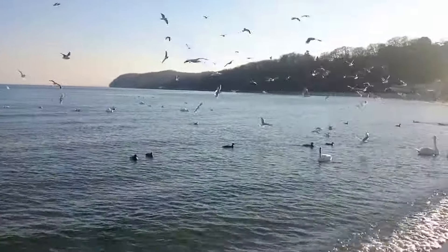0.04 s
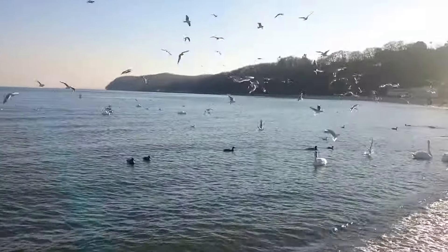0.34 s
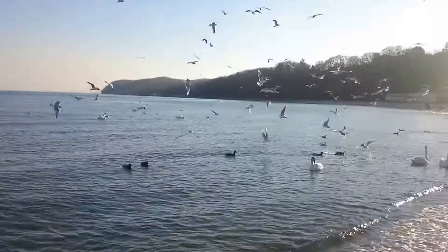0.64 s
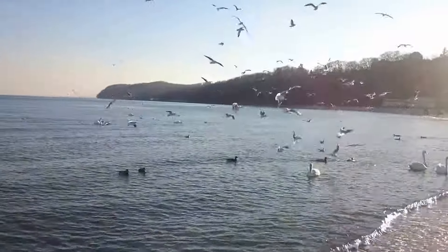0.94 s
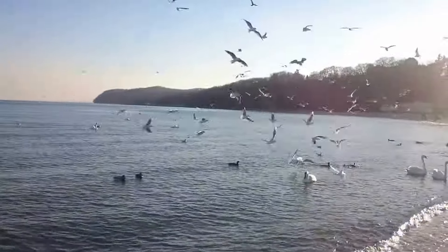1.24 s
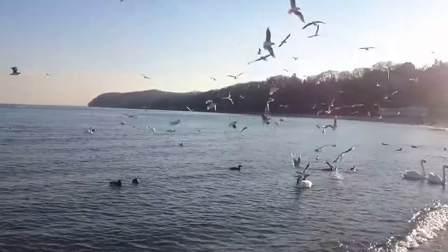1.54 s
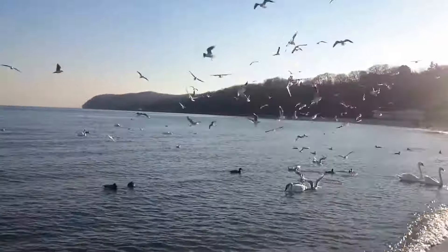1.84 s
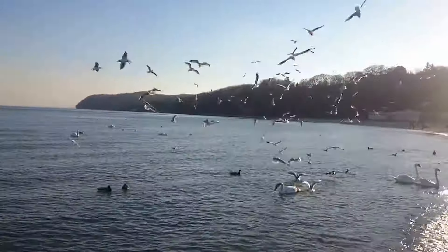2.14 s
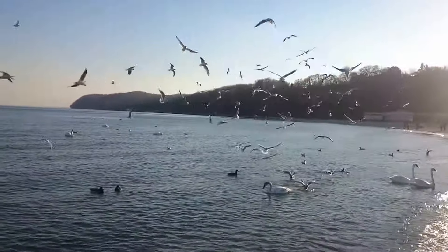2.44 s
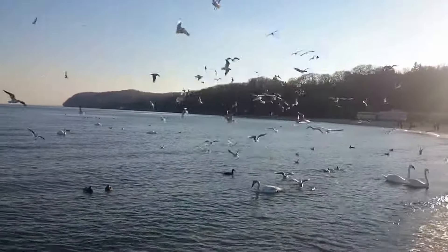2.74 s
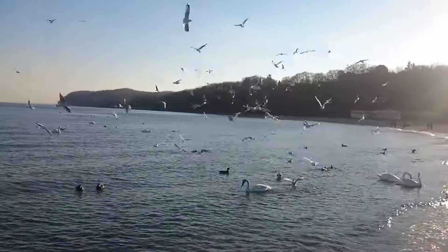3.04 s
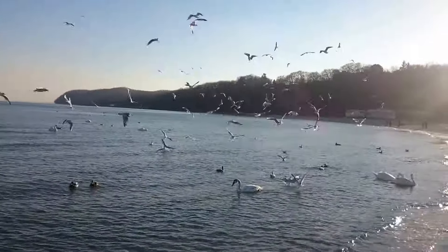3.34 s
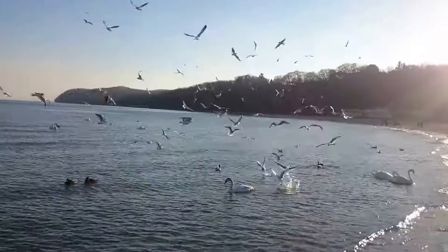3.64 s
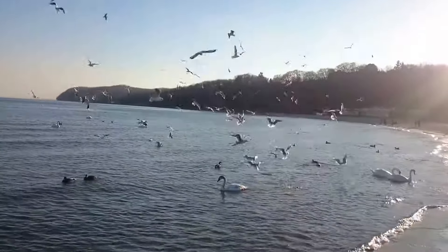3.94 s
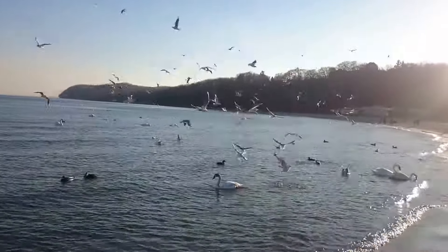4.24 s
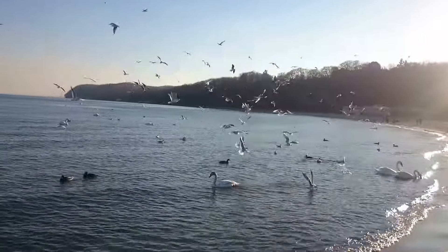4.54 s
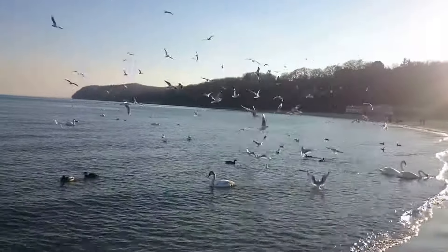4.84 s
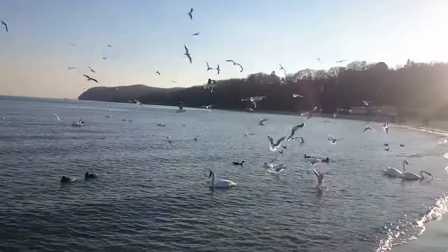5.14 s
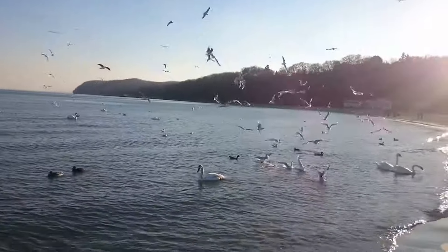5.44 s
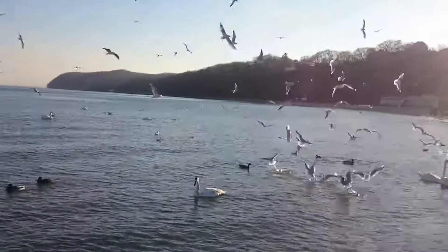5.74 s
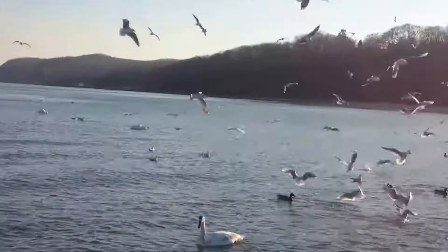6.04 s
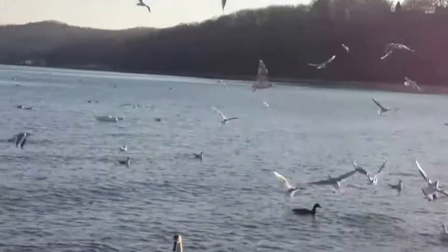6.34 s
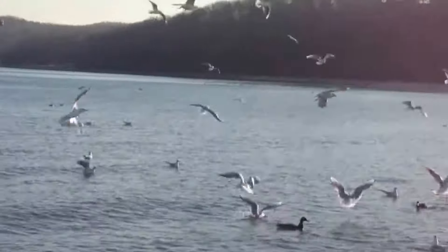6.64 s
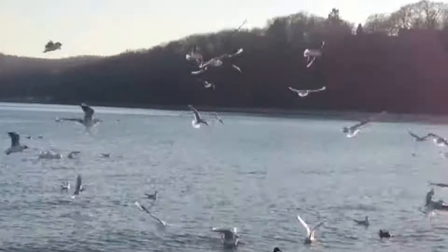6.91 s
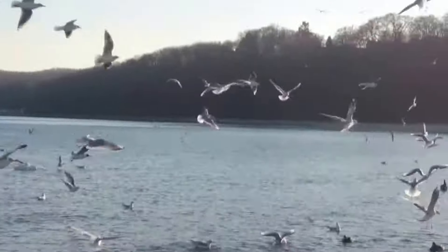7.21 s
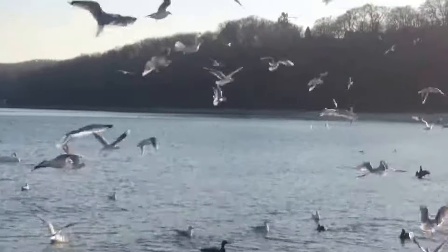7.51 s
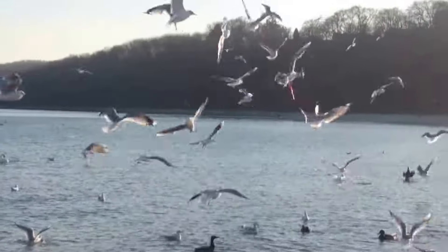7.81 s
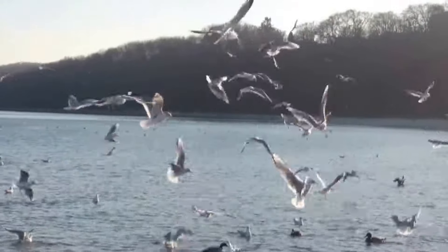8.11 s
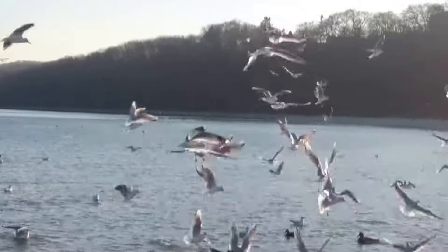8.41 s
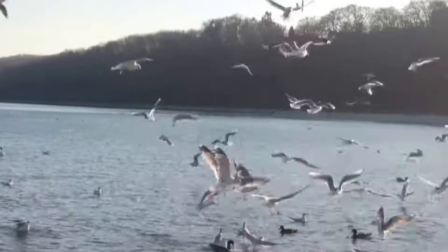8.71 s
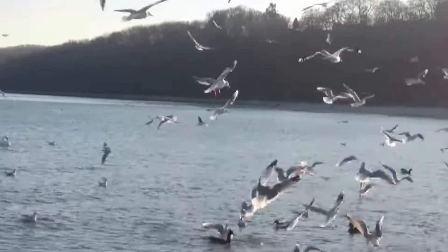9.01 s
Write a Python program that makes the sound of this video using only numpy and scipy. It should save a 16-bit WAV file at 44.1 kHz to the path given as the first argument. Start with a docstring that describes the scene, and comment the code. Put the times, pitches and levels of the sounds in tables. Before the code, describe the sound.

A long, high gull squeal opens, followed by short hoarse barks, thin whistles and more squeals from a flock over the water, mostly to the left. Small waves keep breaking on the beach, bubbling and leaving foam hissing on the right. A light breeze rumbles on the microphone and thumps a few times midway. Toward the end, rattling cries join in and the squabble grows loudest.

```python
"""Gulls squabble over the water off a beach. A long squeal opens the scene; rasping barks, thin whistles
and more squeals follow, all from vibrating syrinx membranes, mirrored by the water and faintly echoed
by the wooded shore. Meanwhile small waves break in a rush of bubbles, leaving foam hissing on the right,
and a light breeze rumbles on the microphone ports, thumping between 4 and 5.5 s. From 6.5 s rattling
cries join in, and the squabble is loudest near 8.5 s."""
import sys
import numpy as np
from scipy import signal
from scipy.fft import rfft, irfft, next_fast_len
from scipy.io import wavfile
from scipy.ndimage import uniform_filter1d, map_coordinates

SR = 44100
rng = np.random.default_rng(int(sys.argv[2]) if len(sys.argv) > 2 else 0)


def wav_record(signal):
    """Record a signal, one row per channel, as 16-bit PCM in the file named by sys.argv[1]."""
    frames = np.transpose(np.atleast_2d(signal))
    bounded = np.clip(frames, -1, 1)
    # unit amplitude maps onto the largest positive 16-bit level
    quanta = np.round(bounded * 32767).astype(np.int16)
    wavfile.write(sys.argv[1], SR, quanta)


N = 404397
TIME = np.arange(N) / SR
CALL_SIZE = SR // 2
CALL_TIME = np.arange(CALL_SIZE) / SR  # s since a call's window opens

# Stereo position of the flock: time_s, left_minus_right_db
FLOCK_BALANCE = [(0, 9.5), (.95, 11), (1.35, 9), (3.1, 10), (4.8, 13), (6.7, 18), (7.8, 12.5), (8.45, 9.5),
                 (8.8, 12)]
def gulls(echo_db=-14, near_reflection_db=-5, water_reflectance=.58):
    """Multipath propagation: calls arrive directly, mirrored in the water and echoed by the shore."""
    far = barks() + far_flock()
    near = whistles() + rattles() + squeals()
    reflected = far + amp(near_reflection_db) * near
    lags_s = [.0022 + 0.000497 * wobble(1.8) for port in range(2)]  # the detour changes as they fly
    mirrored = np.array([map_coordinates(reflected, [np.arange(N) - SR * lag]) for lag in lags_s])
    echo = amp(echo_db) * sides([7]) * shore_echo(reflected)
    return sides(curves(FLOCK_BALANCE)[0]) * (far + near + water_reflectance * mirrored) + echo


# Harsh low-register calls:
# middle_s, length_s, pitch_hz, level_db, roughness, tilt_db_per_octave, glide_octaves
BARK_CALLS = [(.86, 0.04, 920, -37.5, 0.43, -14, -0.045), (1.127, 0.05, 1120, -27.5, 0.63, -4.5, -0.32),
              (1.331, 0.042, 1086, -25.5, 0.55, -1.5, -0.11), (1.355, 0.044, 965, -27, 0.55, -3, -0.3),
              (1.43, 0.029, 1078, -28.5, 0.04, 8, -0.22), (3.625, 0.15, 914, -38, 0.89, -9, -0.12),
              (3.95, 0.18, 1007, -34.5, 0.8, -3, -.35), (4.766, 0.017, 1087, -31, 0.13, -5, -0.0086),
              (4.785, 0.077, 947, -36.5, 0.76, -10, -0.16), (4.866, 0.038, 1058, -25.5, 0.3, -6, -0.084),
              (5.431, 0.042, 952, -35, 0.75, 3, 0.081), (5.946, 0.041, 1048, -32, 0.22, -11, -0.0053),
              (6.075, 0.057, 922, -44, 0.5, -13, -0.18), (6.19, 0.073, 927, -41.5, .5, -10, 0.13),
              (6.221, 0.042, 1053, -33, 0.34, -0.5, -0.15), (6.428, 0.043, 1040, -33, 0.26, -1, 0.013),
              (6.5, 0.12, 1056, -34, 0.4, -0.5, -.03), (6.775, 0.085, 1024, -35.5, .5, 1, -0.2),
              (7.25, 0.054, 1090, -34.5, .75, -1, -0.15), (8.152, 0.037, 1000, -37, 0.4, -10.5, -0.08),
              (8.31, 0.045, 1000, -40.5, 0.7, -7, 0.023), (8.43, 0.069, 1265, -28, 0.67, -2, 0.21),
              (8.512, 0.036, 1077, -26.5, .7, -2, 0.11), (8.536, .022, 1109, -18.5, .45, 0, -0.039),
              (8.615, .07, 1440, -34, 0.56, -1, -.05), (8.793, 0.044, 1107, -29, 0.58, -4, -.3),
              (8.997, 0.066, 1032, -32, 0.92, -6, 0.034)]
def barks():
    """Irregular vibration of strained membranes gives short, hoarse calls."""
    return calls(BARK_CALLS, bark_voice, arch=0.14, edge=0.71)


# Resonances of a gull's throat and open bill: frequency_hz, gain_db
VOCAL_TRACT = [(600, -67), (1100, -21.5), (1700, 0.5), (2200, -4.5), (2700, 3.5), (3400, 4), (4300, 4),
               (4900, -1.5), (5600, 1), (6300, -5.5), (7100, -5.5), (8000, -15), (10000, -28), (14000, -59)]
def bark_voice(pitch, rough, tilt_db, jitter=0.0295, waver=0.0196, pull=0.047, air=0.91, scatter=0.99):
    """Source and filter: the throat shapes frayed harmonics and turbulent air, pulsed by the rasp."""
    def throat(hz):
        return amp(along(VOCAL_TRACT, hz) + tilt_db * np.clip(octaves(hz, 3400), -.8, .8))

    def fray():  # random phase widens a harmonic into a band
        offset, knots = 2 * np.pi * rng.random(), CALL_TIME[::64]
        return offset + scatter * rough * np.interp(CALL_TIME, knots, rng.standard_normal(len(knots)))

    cycle, bursts = rasp(rough)
    unsteady = jitter * wobble(700, CALL_SIZE) + waver * wobble(88.9, CALL_SIZE)
    phase = phase_of(pitch * (1 + rough * (unsteady + pull * cycle)))  # each burst pulls the pitch up
    tone = sum(throat(k * pitch) * amp(3.2 * rng.standard_normal()) * np.sin(k * phase + fray())
               for k in range(1, 9))
    breath = filtered(rng.standard_normal(CALL_SIZE), throat)
    air_share = np.clip(air * rough, 0, 1)
    return bursts * (np.sqrt(1 - air_share ** 2) * unit(tone) + air_share * unit(breath))


# Rattling cries of near birds: middle_s, length_s, pitch_hz, level_db, roughness,
# beat_hz, bill_hz, focus_db_per_octave, glide_octaves
RATTLE_CALLS = [(6.554, 0.069, 1026, -36, .5, 80, 2400, 3, -.25),
                (6.65, 0.13, 992, -38.5, 0.82, 80, 2300, 11, -0.025),
                (7.6725, 0.043, 1120, -25, 0.33, 110, 3660, 15, -0.022),
                (7.8065, 0.062, 1110, -28.5, 0.5, 95, 3370, 4, -0.048),
                (8.0455, 0.051, 1122, -28.5, .4, 110, 3200, 9.5, 0.035),
                (8.661, 0.07, 1130, -25.5, .95, 76.4, 4040, 4, -0.15),
                (8.746, 0.086, 1160, -21, 0.9, 91, 4500, 3, -0.037),
                (8.862, 0.06, 1130, -25, 0.5, 68, 3870, 2, -.2)]
def rattles():
    """Deep amplitude modulation chops each cry into nearly even beats."""
    return calls(RATTLE_CALLS, rattle_voice, arch=.08, edge=1.15)


def rattle_voice(pitch, rough, beat_hz, bill_hz, focus_db, depth_db=5.0, pull=0.017, jitter=.045):
    """Formant filtering: the bill picks out a few harmonics, whose level and pitch each beat lifts."""
    def bill(hz):
        return amp(along(VOCAL_TRACT, hz) - focus_db * np.abs(octaves(hz, bill_hz)))

    cycle = centred_cycle(beat_hz * (1 + 0.05 * wobble(66, CALL_SIZE)))
    phase = phase_of(pitch * (1 + pull * cycle + rough * jitter * wobble(500, CALL_SIZE)))
    tone = 0
    for k in range(1, 9):
        fray = 2 * np.pi * rng.random() + rough * wobble(400, CALL_SIZE)
        tone += bill(k * pitch) * np.sin(k * phase + fray)
    breath = filtered(rng.standard_normal(CALL_SIZE), bill)
    beats = amp(depth_db * cycle + wobble(beat_hz, CALL_SIZE))
    return unit(beats * (unit(tone) + rough * unit(breath)))


# Clear high-register notes: middle_s, length_s, pitch_hz, level_db, roughness
WHISTLE_CALLS = [(.55, 0.15, 3640, -56, .05), (2.348, .049, 1847, -44, 0.75),
                 (2.435, 0.1, 1764, -47.5, 0.58), (2.519, 0.087, 1816, -47.5, 0.28),
                 (2.63, 0.11, 1774, -50, 0.42), (2.773, 0.12, 1773, -47.5, 0.53),
                 (3.361, .12, 2870, -40.5, .75), (4.97, 0.055, 3000, -40, 0.18),
                 (5.043, 0.065, 4350, -46, 0.15), (5.112, 0.081, 3030, -43.5, .2),
                 (5.259, .18, 3140, -49, 0.46), (6.34, .097, 2380, -51, 0.3), (6.451, .04, 2500, -38, .7),
                 (6.561, .1, 2090, -42, .55), (6.768, .065, 3084, -35.5, 0.15),
                 (7.191, .11, 2830, -45.5, 0.65), (7.866, .09, 2950, -38.5, 0.7),
                 (8.473, 0.056, 3210, -27, 0.08), (8.476, 0.068, 4520, -32, 0.1),
                 (8.566, .032, 3170, -30, 0.4), (8.572, .06, 4400, -35, 0.25),
                 (8.625, .04, 2854, -32, 0.55), (8.83, .036, 4230, -37, .3)]
def whistles(overtone_db=-17, glide_octaves=-.06):
    """Nearly sinusoidal vibration gives thin notes that fall slightly in pitch."""
    rows = [(*row, overtone_db, glide_octaves) for row in WHISTLE_CALLS]
    return calls(rows, whistle_voice, arch=.05, edge=5.5)


def whistle_voice(pitch, rough, overtone_db, jitter=0.133, waver=0.0484, air=0.82, focus_db=12):
    """Random frequency modulation: strain scatters a tone and its two overtones into a screech."""
    def bill(hz):
        return amp(along(VOCAL_TRACT, hz) - focus_db * np.abs(octaves(hz, pitch.mean())))

    _, bursts = rasp(rough, flutter_hz=159.0, depth_db=-1.5, uneven_db=3)
    unsteady = jitter * wobble(1100, CALL_SIZE) + waver * wobble(110, CALL_SIZE)
    phase = phase_of(pitch * (1 + rough * unsteady))
    tone = np.sin(phase)
    for k in (2, 3):
        rolloff = 1 + (k * pitch / 8000) ** 16  # overtones fade above the bill's range
        tone += amp((k - 1) * overtone_db) / (k - 1) * np.sin(k * phase) / rolloff
    breath = filtered(rng.standard_normal(CALL_SIZE), bill)
    return bursts * (np.sqrt(2) * tone + air * rough * unit(breath))


# Long cries, one list a voice; the last two are the two sides of one bird's syrinx:
# time_s, pitch_hz, level_db, roughness, overtone_db
SQUEAL_CONTOURS = [
    [(.058, 2410, -29, 0.3, -20), (.068, 2477, -27.5, 0.2, -11), (.09, 2418, -24.5, 0, -14),
     (.128, 2590, -33, 0.14, -21), (.168, 2390, -24, 0.05, -9.5), (.2, 2410, -30, 0.05, -32),
     (.272, 2480, -25, 0, -14), (.305, 2210, -36.5, 0.5, -7), (.39, 2440, -37.5, 0.99, -16),
     (.472, 2780, -46, 0.85, -29)],
    [(.905, 3280, -40, 0.2, -32), (.94, 3460, -46.5, 0.53, -13), (1.0, 3710, -44, 0.42, 1),
     (1.055, 3920, -34, 0.42, -8), (1.08, 3410, -35, 0.63, -10), (1.105, 2700, -37.5, 0.6, -10.5),
     (1.155, 1874, -39, 0.55, -8)],
    [(3.02, 3300, -48, 0.08, -32), (3.06, 3660, -41, 0.28, -4), (3.1, 3765, -43, 0.2, -10),
     (3.155, 3670, -40.5, 0.06, -9), (3.2, 3900, -46, 0.17, -2), (3.22, 3920, -33, 0.27, -17),
     (3.252, 3560, -33, 0.48, -23), (3.265, 2390, -41.5, 0.52, 1), (3.305, 1886, -43, 0.8, 2)],
    [(3.04, 4060, -46, 0.37, -30), (3.09, 4240, -35.5, 0.16, -24), (3.16, 4200, -33.5, 0.15, -28),
     (3.225, 4290, -50, 0.5, -30)],
]
# Register changes, one list a voice: start_s, end_s, jump_octaves, change_db
REGISTER_FLIPS = [
    [(0.178, 0.251, 0.2, -2.5)],
    [],
    [(3.108, 3.139, -0.18, 8)],
    [(3.108, 3.145, 0.24, -7)],
]
def squeals(flip_s=0.0038, attack_s=0.0038, release_s=0.0059):
    """Register breaks: long cries jump between modes of vibration and roughen into a screech."""
    track = np.zeros(N)
    for contour, flips in zip(SQUEAL_CONTOURS, REGISTER_FLIPS):
        start, end = contour[0][0], contour[-1][0]
        t = start + CALL_TIME
        pitch, db, rough, overtone_db = curves(contour, t)
        for on, off, jump, change_db in flips:
            flipped = np.clip(.5 + np.minimum(t - on, off - t) / flip_s, 0, 1)
            pitch = pitch * 2 ** (jump * flipped)
            db = db + change_db * flipped
        gate = np.clip(np.minimum(CALL_TIME / attack_s, (end - t) / release_s), 0, 1)
        add(track, start, amp(db) * gate * whistle_voice(pitch, rough, overtone_db))
    return track


def rasp(rough, flutter_hz=84, depth_db=2.0, uneven_db=2.7):
    """Amplitude modulation: strained membranes open in bursts. Returns the cycle and its gain."""
    rate_hz = flutter_hz * (1 + 0.078 * rng.standard_normal() + 0.104 * wobble(39.1, CALL_SIZE))
    cycle = centred_cycle(rate_hz)
    gain_db = depth_db * rough ** 2 * cycle + uneven_db * rough * wobble(160.1, CALL_SIZE)
    return cycle, unit(amp(gain_db))


def calls(rows, voice, arch, edge, full_db=-26, dulling=0.57):
    """Envelope and glide: each call swells and fades as its pitch bends; far, faint ones lose treble."""
    track, centre = np.zeros(N), CALL_TIME.mean()
    for middle_s, length_s, pitch, db, rough, *timbre, glide in rows:
        position = np.clip(2 * (CALL_TIME - centre) / length_s, -2, 2)  # -1 to 1 across the call
        steepness = np.where(position < 0, 2 * edge, edge)  # the start is more abrupt than the end
        envelope = np.exp(-np.abs(position) ** steepness) * np.cos(np.pi * position / 4)
        bend_octaves = glide * position / 2 - arch * position ** 2 * (1 - rough / 2)
        call = amp(db) * envelope * voice(pitch * 2 ** bend_octaves, rough, *timbre)
        treble_db = dulling * min(db - full_db, 0)
        dulled = filtered(call, lambda hz: amp(treble_db * np.clip(octaves(hz, 3500), 0, 1)))
        add(track, middle_s - centre, dulled)
    return track


def far_flock(count=60, level_db=-66.5, rough=.7, tilt_db=-2.5, glide_octaves=-.1):
    """Incoherent summation: hoarse, distant calls at random times merge into a dull din."""
    rows = [((i + delay) * N / SR / count, .05 + .1 * length, 800 + 400 * pitch,
             level_db + 6 * (strength - .5), rough, tilt_db, glide_octaves)
            for i, (delay, length, pitch, strength) in enumerate(rng.random((count, 4)))]
    din = calls(rows, bark_voice, arch=0.12, edge=1.0)
    return filtered(din, lambda hz: 1 / np.sqrt(1 + (hz / 3900) ** 20))


def shore_echo(sound, t60_s=0.53):
    """Diffuse scattering from waves and shore gives each port its own exponentially decaying tail."""
    tail = rng.standard_normal((2, CALL_SIZE)) * amp(-60 * CALL_TIME / t60_s)
    return signal.fftconvolve(sound[None], tail / np.linalg.norm(tail[0]), axes=1)[:, :N]


# Spectra of tumbling water, spray, foam and trapped air pockets: frequency_hz, density_db
WATER_SPECTRUM = [(60, 4), (150, 0), (300, -3), (500, 0.5), (800, 1.5), (1300, 2.5), (2200, 1), (3500, -1),
                  (6000, -24.5), (12000, -52)]
SPRAY_SPECTRUM = [(200, -30), (600, -12.5), (1300, -10), (2200, -11), (4000, -11), (5600, -7.5),
                  (7000, -14), (8500, -23), (11000, -37.5), (15000, -54)]
FOAM_SPECTRUM = [(3000, -32), (7000, 3), (9500, -3), (12500, -2), (14000, -6), (15700, -30)]
POCKET_SPECTRUM = [(80, -13), (170, -10.5), (250, -1.5), (350, -6), (600, -0.5), (1500, -27.5)]
# Depth of each layer's random wavering: water_db, spray_db, foam_db
WAVER_DEPTHS = (0.5, 0.8, 1.3)
def surf(spray_gain_db=1, foam_gain_db=3, boom_db=-41.0):
    """Bubble resonance: the smaller the higher, from booming air pockets to foam fizzing on the sand."""
    water_db, spray_db, foam_db = wave_levels()
    gurgle = [bubbles(4000, low_hz=447, high_hz=2570, cycles=6.2, spread_db=0.5) for port in range(2)]
    drops = [bubbles(7000, low_hz=1800, high_hz=9000, cycles=8, spread_db=2.5) for port in range(2)]
    pops = [bubbles(4000, low_hz=7000, high_hz=14000, cycles=3, spread_db=3.5) for port in range(2)]
    water_waver, spray_waver, foam_waver = [depth * wobble(17) for depth in WAVER_DEPTHS]
    water = amp(water_db + water_waver) * wash(WATER_SPECTRUM, gurgle, grainy=0.21, patchy_db=2.0)
    spray = amp(spray_db + spray_waver) * wash(SPRAY_SPECTRUM, drops, grainy=0.42, patchy_db=1.6)
    foam = amp(foam_db + foam_waver) * wash(FOAM_SPECTRUM, pops, grainy=0.27, patchy_db=2.0)
    # a big wave traps large air pockets: their boom grows faster than the wash
    pockets = unit(filtered(rng.standard_normal(N), lambda hz: amp(along(POCKET_SPECTRUM, hz))))
    boom = amp(boom_db + 3.05 * (spray_db - spray_db.max())) * sides([6]) * pockets
    return water + boom + amp(spray_gain_db) * spray + amp(foam_gain_db) * foam


# Waves reaching the sand: break_s, tumble_s, water_db, spray_db, fizz_db, lingering_foam_db
BREAKERS = [(-0.3, 0.4, -49.5, -43.5, -61.5, -61), (1.11, 0.31, -68.5, -41, -56.5, -105),
            (1.45, 0.64, -45, -36, -50, -93), (2.2, 0.025, -49, -47, -59, -71.5),
            (3.481, 0.72, -45.5, -41, -61, -77), (4.2, 0.38, -44, -46, -65, -73),
            (5.05, 0.53, -51, -65, -75, -94), (6.84, 0.4, -46.5, -45.5, -60.5, -72.5),
            (7.4, 0.47, -44, -42.5, -61, -92), (8.55, 0.4, -47, -55, -62.5, -89.5)]
def wave_levels(step_s=.005, crest_db=1, lapping_db=-52, fine_spray_db=-77):
    """Incoherent powers add: overlapping waves sum to level curves in dB for water, spray and foam."""
    t = np.arange(0, N / SR + step_s, step_s)

    def power(db, start, end, swell, fade):  # held from start to end; swell and fade in dB per s
        return amp(db - swell * np.maximum(start - t, 0) - fade * np.maximum(t - end, 0)) ** 2

    water, spray, foam = amp(lapping_db) ** 2, amp(fine_spray_db) ** 2, 0
    for start, tumble_s, water_db, spray_db, fizz_db, lingering_db in BREAKERS:
        end = start + tumble_s
        crest = crest_db * np.sin(np.pi * np.clip((t - start) / tumble_s, 0, 1))
        water += power(water_db + crest, start, end, swell=21, fade=42)
        spray += power(spray_db + crest, start, end, swell=70, fade=88)
        foam += power(fizz_db + crest, start, end, swell=60, fade=80)
        foam += power(lingering_db, end, end, swell=60, fade=3.5)
    return [np.interp(TIME, t, 10 * np.log10(layer)) for layer in (water, spray, foam)]


# Stereo position of the surf: frequency_hz, left_minus_right_db
SURF_BALANCE = [(100, 46), (250, 8), (1300, 5.5), (2400, 7), (4400, 13.5), (6300, -0.5), (8100, -5.5),
                (13000, -9)]
# Likeness of the surf at the two ports: frequency_hz, correlation
SURF_COHERENCE = [(100, -0.3), (300, 0.98), (600, 0.57), (1100, 0.22), (2000, 0.0069), (5000, -0.056)]
def wash(spectrum, grains, grainy, patchy_db):
    """Partial coherence: a patchy rush with bubbles in it, partly alike at the ports; its mid has rms 1."""
    def mid_and_side(hz):
        angle = np.arccos(along(SURF_COHERENCE, hz)) / 2
        return amp(along(spectrum, hz)) * [np.cos(angle), np.sin(angle)]

    rush = rng.standard_normal((2, N)) + grainy * np.array(grains)
    frames = signal.stft(rush, nperseg=512)[2]
    patches = uniform_filter1d(rng.standard_normal(frames.shape[1:]), size=7, axis=0)  # over frequency
    patches = uniform_filter1d(patches, size=10, axis=1)  # over time
    patchy = signal.istft(frames * amp(patchy_db * unit(patches)), nperseg=512)[1][:, :N]
    mid, side = filtered(patchy, mid_and_side)
    stereo = filtered(np.array([mid + side, mid - side]), lambda hz: sides(along(SURF_BALANCE, hz)))
    return stereo / stereo.mean(axis=0).std()


def bubbles(count, low_hz, high_hz, cycles, spread_db):
    """Random superposition: a cloud of short bubble rings, some louder than the rest."""
    when, tuning, strength = rng.random((3, count, 1))
    hz = low_hz * (high_hz / low_hz) ** tuning
    samples = np.arange(320)
    gain = amp(spread_db * np.minimum(-np.log(1 - strength), 5))
    rings = gain * bubble_ring(samples * hz / SR / cycles, cycles, rise=0.076)
    slots = (when * N).astype(int) + samples
    return unit(np.bincount(slots.ravel(), rings.ravel(), minlength=N)[:N])


def bubble_ring(age, cycles, rise):
    """A damped oscillator rising in pitch; age is 1 after `cycles` periods of its starting pitch."""
    return np.sin(2 * np.pi * cycles * age * (1 + rise * age)) * np.exp(-2 * age)


# Small crests slapping over: middle_s, length_s, pitch_hz, level_db
SMALL_CRESTS = [(3.552, 0.27, 375, -50.5), (4.698, 0.14, 680, -50.5), (5.128, .12, 714, -50.5),
                (5.404, 0.19, 605, -51.5), (5.601, .12, 655, -46.5), (5.633, 0.11, 1420, -48.5),
                (6.963, 0.078, 686, -50)]
def slops(count=36, cycles=9, spread_octaves=0.36, side_db=6):
    """Air entrainment: each small crest traps a cluster of ringing bubbles that share its energy."""
    track = np.zeros((2, N))
    for middle_s, length_s, pitch, db in SMALL_CRESTS:
        for when, tuning, strength, place in rng.standard_normal((count, 4)):
            hz = pitch * 2 ** (spread_octaves * tuning)
            age = CALL_TIME[:CALL_SIZE // 8] * hz / cycles
            ring = bubble_ring(age, cycles, rise=0.121) * (1 - np.exp(-20 * age))
            ring *= amp(db + 1.5 * strength) * np.sqrt(length_s * SR / count / np.sum(ring ** 2))
            for port, gain in zip(track, sides(side_db + 4 * place)):
                add(port, middle_s + when * length_s / 3, gain * ring)
    return track


# Spectrum of the eddies: frequency_hz, density_db
EDDY_SPECTRUM = [(10, 8.5), (25, -1.5), (50, -7), (90, -14), (150, -21), (300, -32), (800, -76)]
# Strength of the breeze: time_s, level_db
BREEZE_STRENGTH = [(0.0, -42.5), (0.95, -42), (1.2, -51), (1.75, -43.5), (2.3, -47.5), (3.25, -51.5),
                   (3.7, -42.5), (4.25, -40), (4.65, -45), (5.2, -41), (6.3, -38.5), (7.1, -45),
                   (9.17, -50)]
# Puffs of air on the ports: middle_s, length_s, level_db
AIR_PUFFS = [(0.933, 0.11, -45.5), (1.001, 0.053, -39), (4.89, 0.12, -46), (5.17, 0.064, -40),
             (5.207, 0.076, -42), (6, 0.14, -47.5)]
# Sudden suctions on the ports: peak_s, level_db
SUCTIONS = [(4.109, -25), (4.27, -29), (5.33, -14.5)]
def wind(rumble_gain_db=5, thump_s=0.0047):
    """Turbulent pressure: eddies rumble on each port separately, puffs flutter and suctions thump."""
    eddies = filtered(rng.standard_normal((2, N)), lambda hz: amp(along(EDDY_SPECTRUM, hz)))
    eddies = unit(eddies * amp(1.9 * np.array([wobble(42), wobble(26)])))
    rumble = amp(curves(BREEZE_STRENGTH)[0] + rumble_gain_db) * eddies
    flutter = unit(filtered(rng.standard_normal(N), lambda hz: 1 / (1 + (hz / 260) ** 4)))
    puffs = flutter * sum(amp(db) * np.exp(-(2 * (TIME - middle_s) / length_s) ** 2)
                          for middle_s, length_s, db in AIR_PUFFS)
    age = CALL_TIME / thump_s
    pulse = np.e * age * (age / 4 - 1) * np.exp(-age)  # a sudden suction and its slow rebound
    thumps = np.zeros(N)
    for peak_s, db in SUCTIONS:
        add(thumps, peak_s - thump_s, amp(db) * pulse)
    return sides([-5.5]) * rumble + sides([9]) * puffs + sides([-12]) * thumps


def amp(db):
    """Decibels to amplitude ratio."""
    return 10 ** (np.asarray(db) / 20)


def unit(x):
    """Normalisation to rms 1."""
    return x / np.sqrt(np.mean(x ** 2) + 1e-20)


def octaves(hz, reference_hz):
    """Interval as the logarithm of a frequency ratio."""
    return np.log2(hz / reference_hz + 1e-9)


def phase_of(hz):
    """Phase in radians as the integral of frequency."""
    return 2 * np.pi * np.cumsum(hz) / SR


def centred_cycle(hz):
    """A cosine of varying frequency with a peak at mid-call."""
    phase = phase_of(hz)
    return np.cos(phase - phase[CALL_SIZE // 2])


def along(points, hz):
    """Interpolation of (frequency_hz, value) points on a logarithmic frequency axis."""
    knots_hz, values = np.transpose(points)
    return np.interp(np.log(hz + 1), np.log(knots_hz + 1), values)


def curves(rows, t=TIME):
    """Linear interpolation of each column after time_s, at the times t."""
    times, *columns = np.transpose(rows)
    return [np.interp(t, times, column) for column in columns]


def wobble(rate, size=N):
    """Smooth noise: a spline through `rate` random knots a second."""
    knots = rng.standard_normal(size // 8 + 4)[:int(size * rate / SR) + 4]
    return map_coordinates(knots, [np.arange(size) * rate / SR], mode="nearest")


def filtered(x, response):
    """Zero-phase filtering: the spectrum of x times response(hz)."""
    size = x.shape[-1]
    padded = next_fast_len(size + 2048)
    return irfft(rfft(x, padded) * response(np.fft.rfftfreq(padded, 1 / SR)), padded)[..., :size]


def sides(balance_db):
    """Constant-power panning: left and right gains; a positive balance leans left."""
    half_db = np.asarray(balance_db) / 2
    pair = amp([half_db, -half_db])
    return pair / np.sqrt(np.mean(pair ** 2, axis=0))


def add(track, start_s, sound):
    """Superposition of a sound on a track from start_s on."""
    start = round(start_s * SR)
    part = sound[max(-start, 0):max(N - start, 0)]
    track[max(start, 0):][:len(part)] += part


def scene():
    """Superposition of gulls, surf, gurgling crests and a light breeze."""
    return gulls() + surf() + slops() + wind()


def record(dry, top_hz=15720):
    """Band limiting: nothing above top_hz is kept."""
    return filtered(dry, lambda hz: hz < top_hz)


dry = scene()
out = record(dry)
wav_record(out)
```